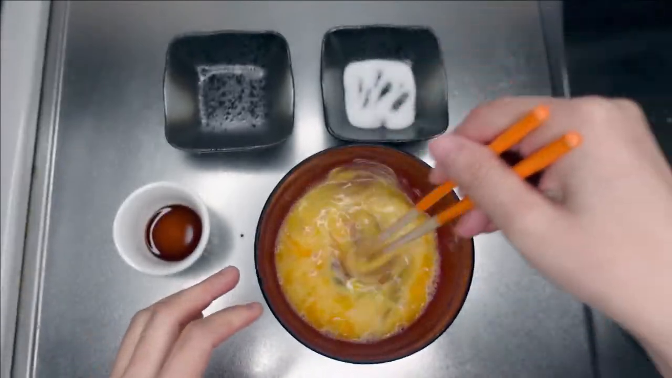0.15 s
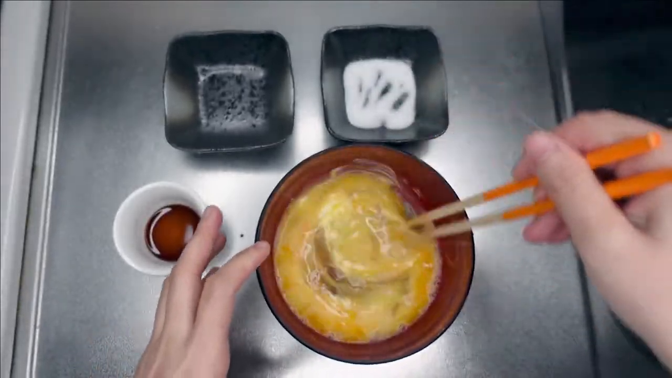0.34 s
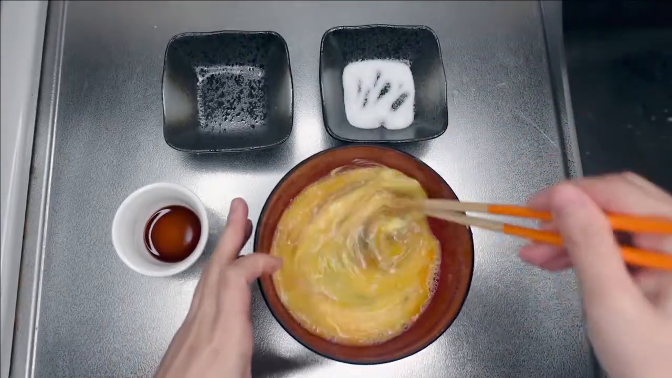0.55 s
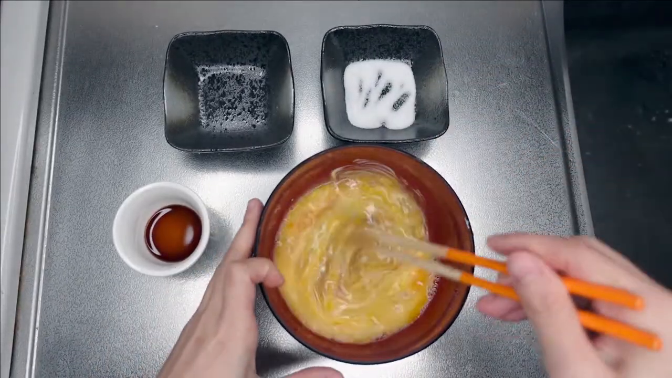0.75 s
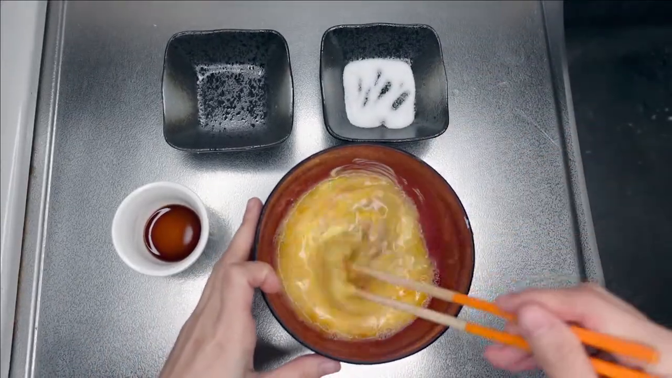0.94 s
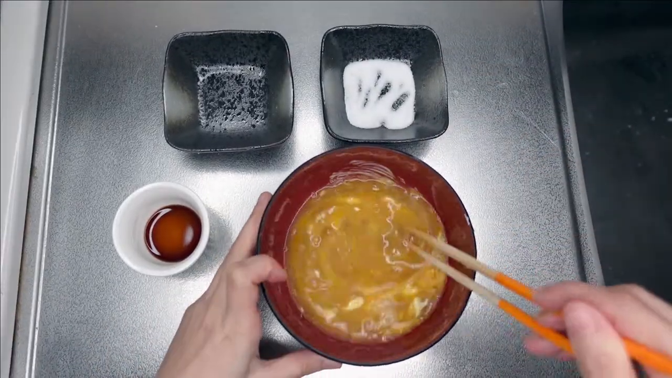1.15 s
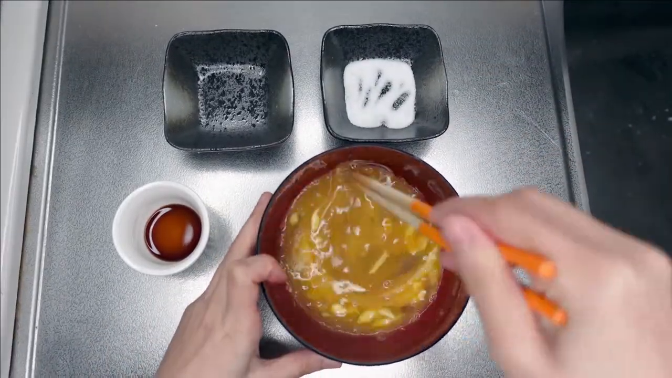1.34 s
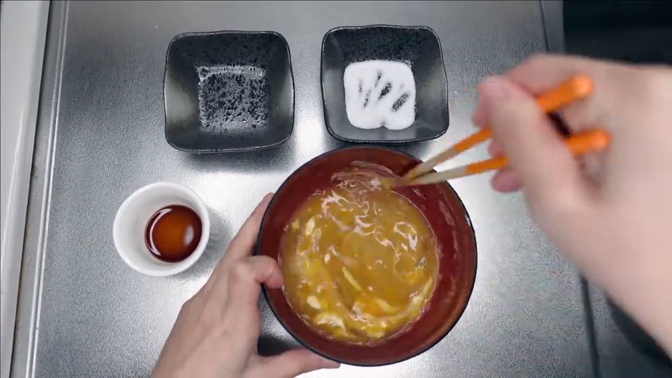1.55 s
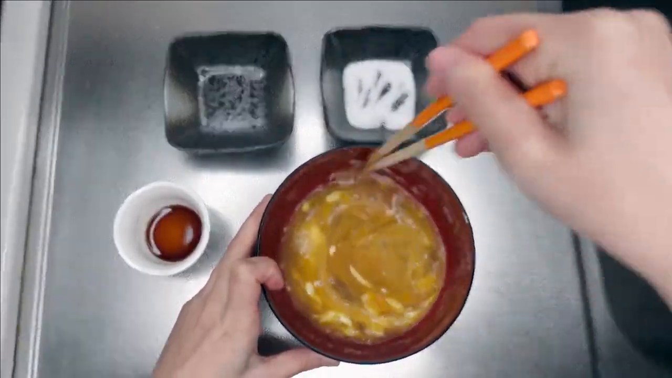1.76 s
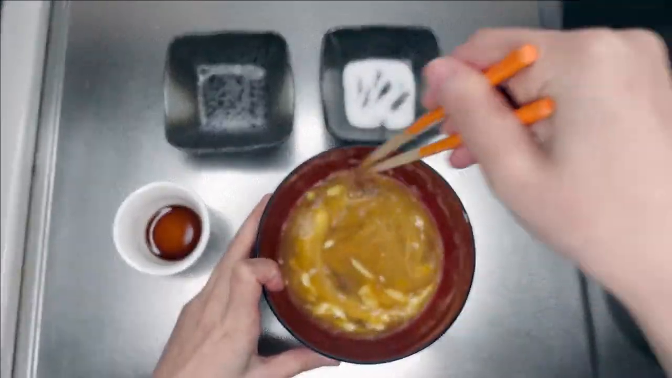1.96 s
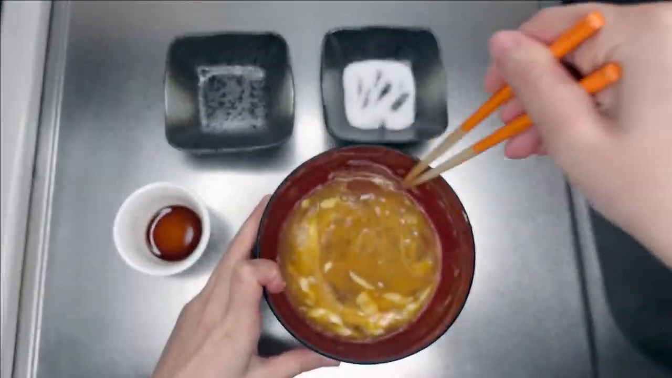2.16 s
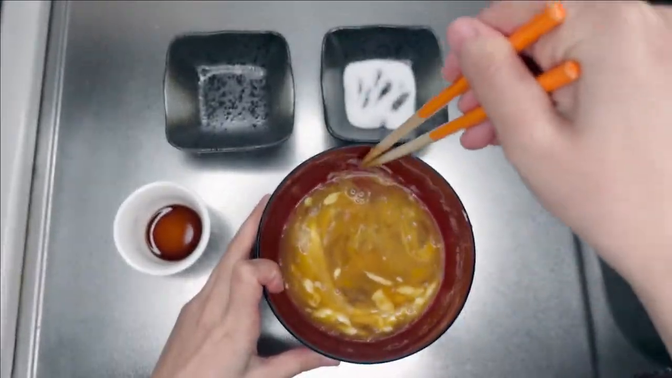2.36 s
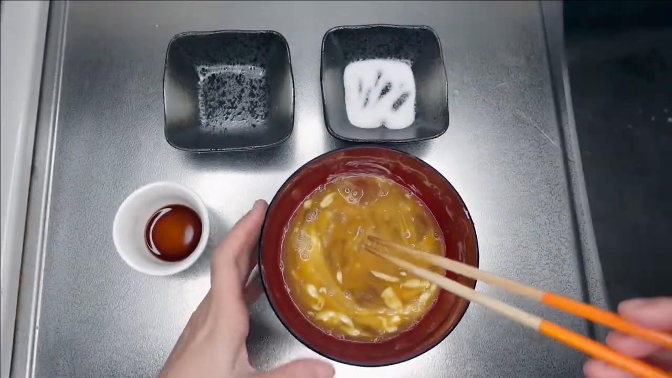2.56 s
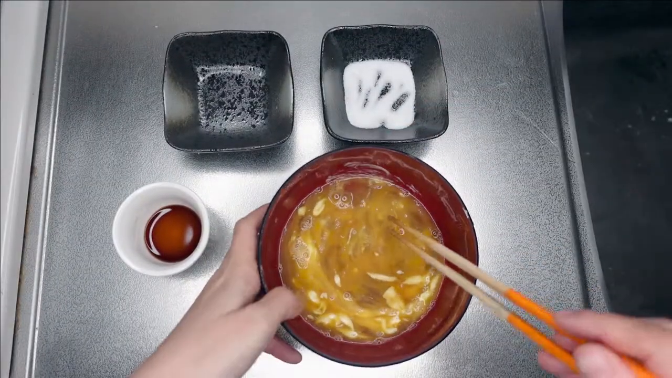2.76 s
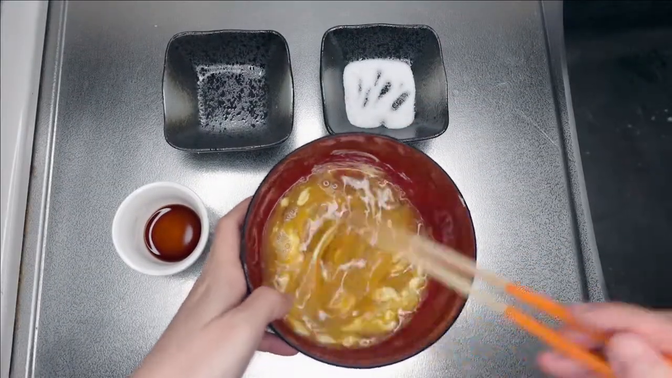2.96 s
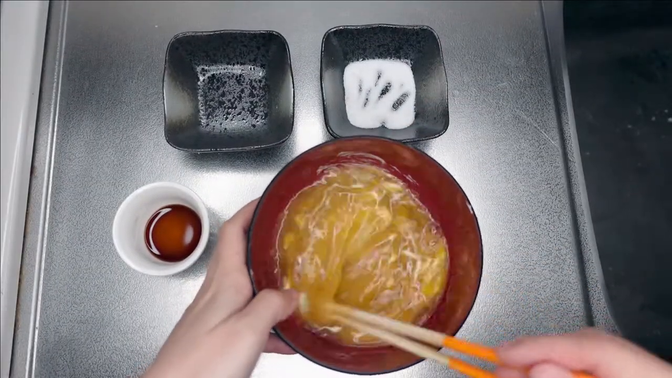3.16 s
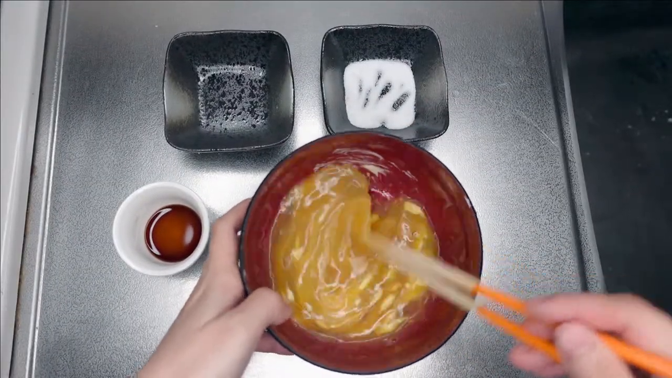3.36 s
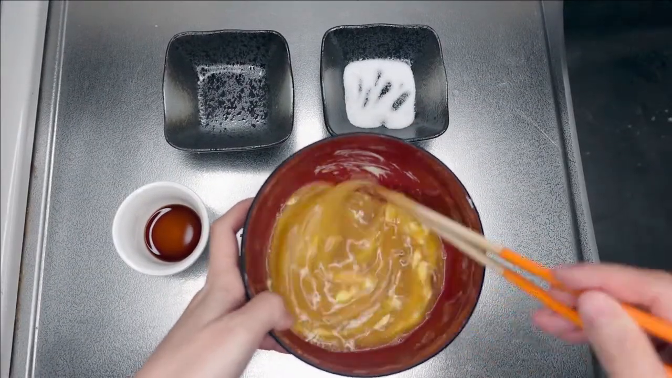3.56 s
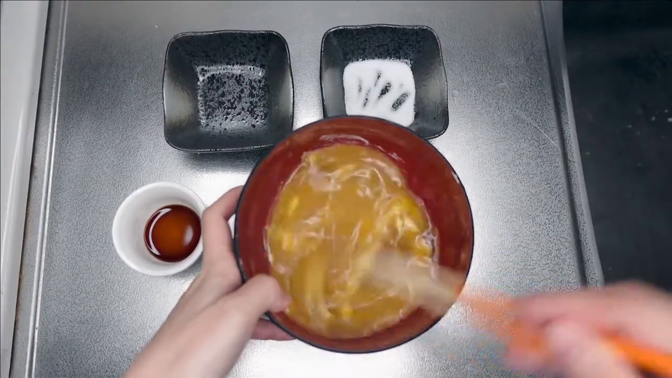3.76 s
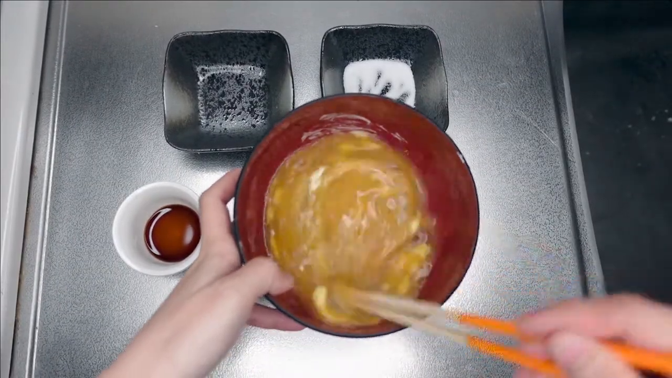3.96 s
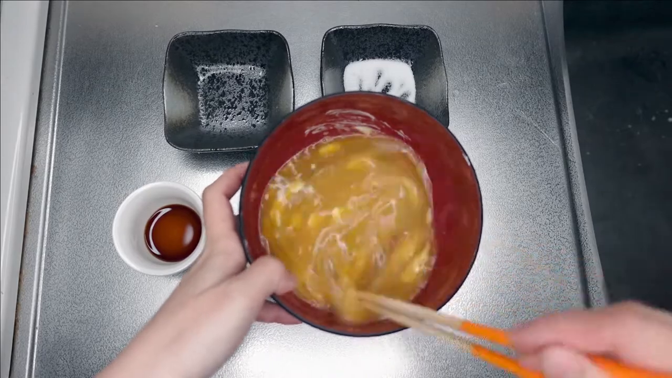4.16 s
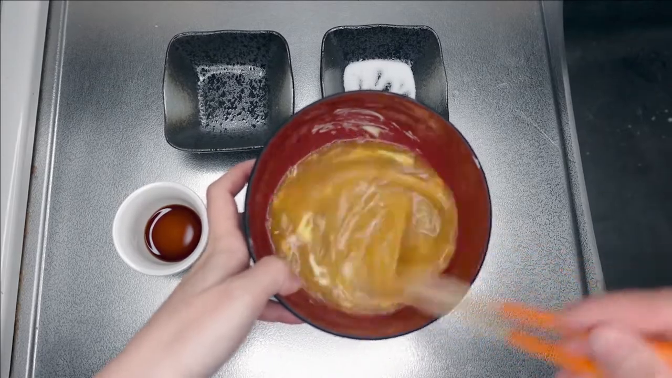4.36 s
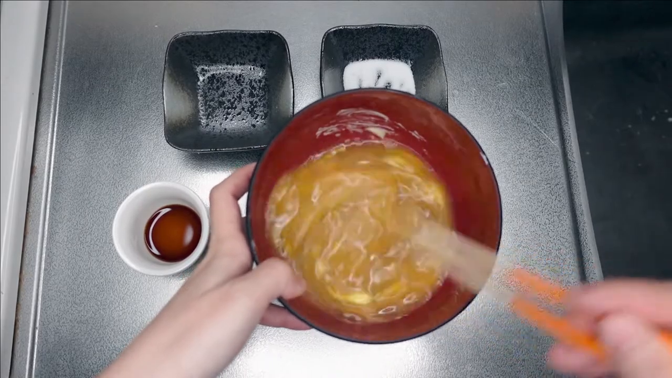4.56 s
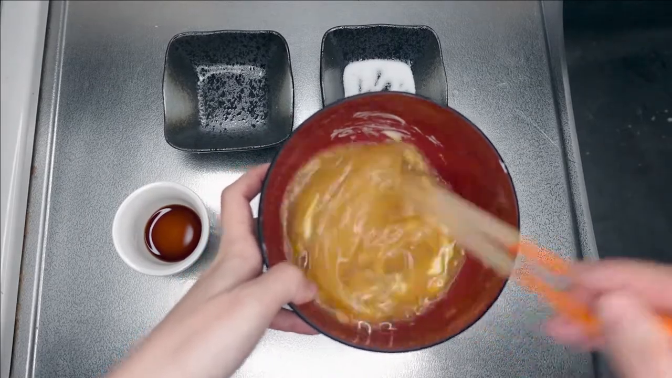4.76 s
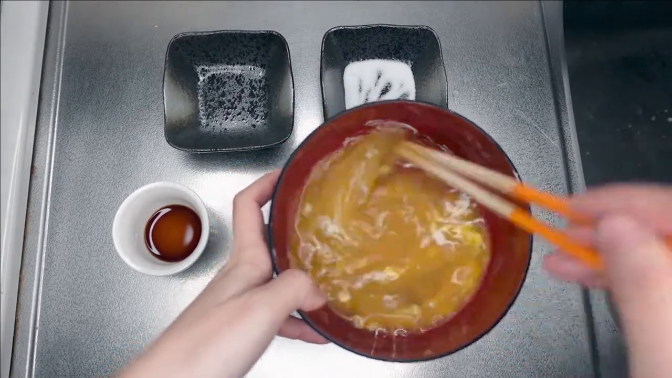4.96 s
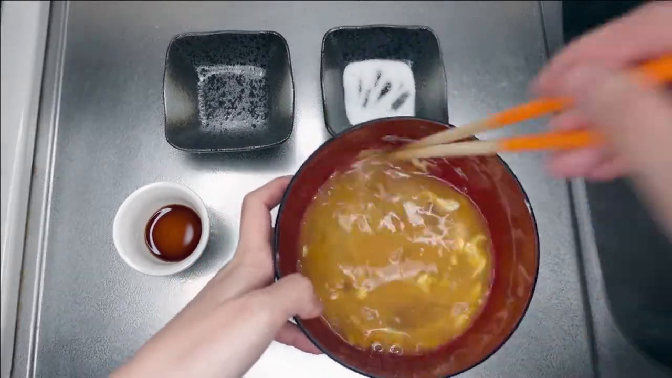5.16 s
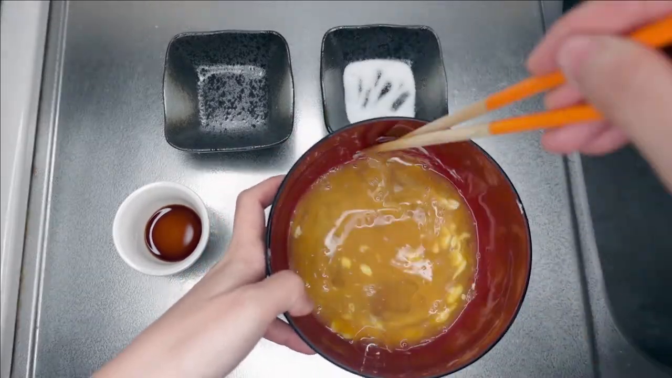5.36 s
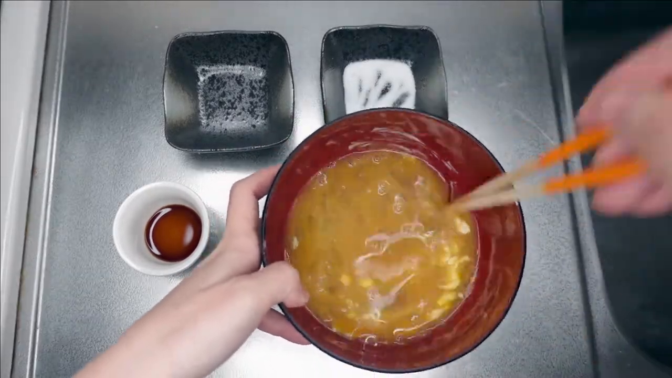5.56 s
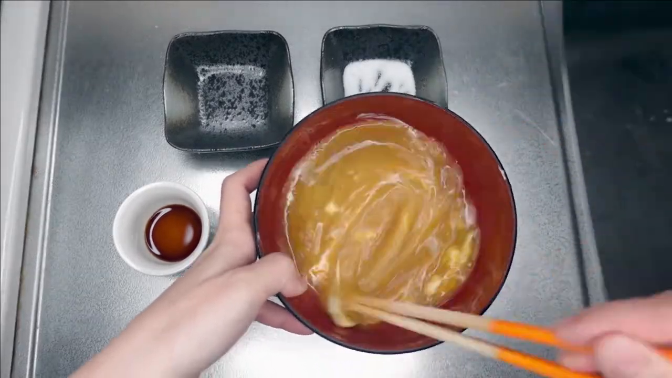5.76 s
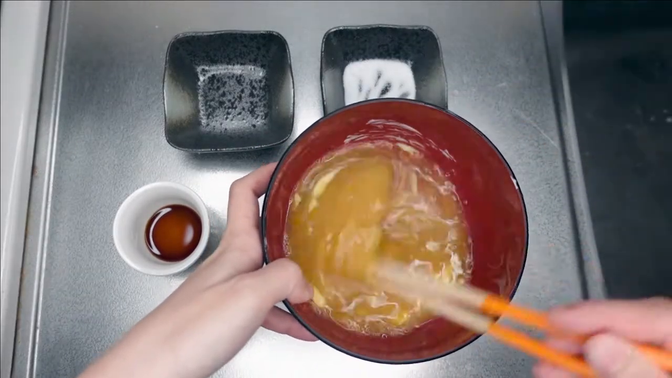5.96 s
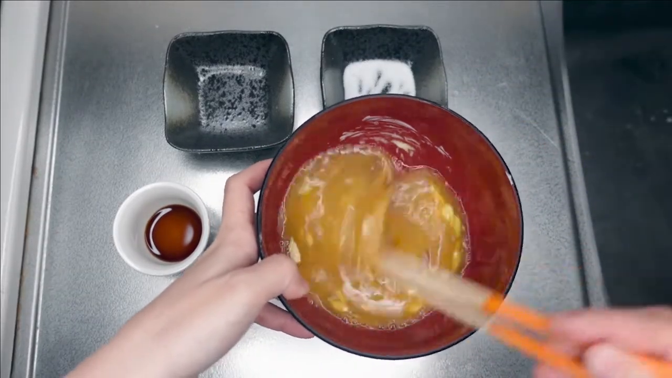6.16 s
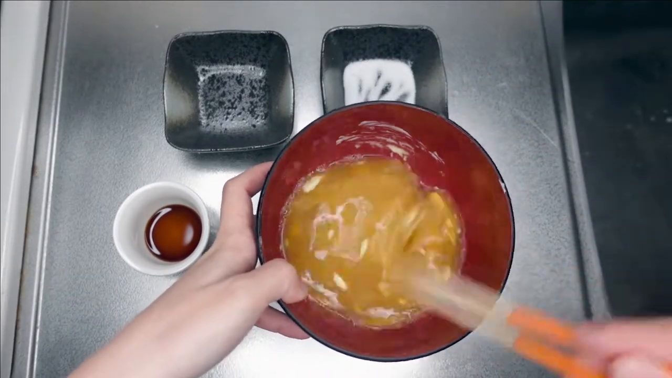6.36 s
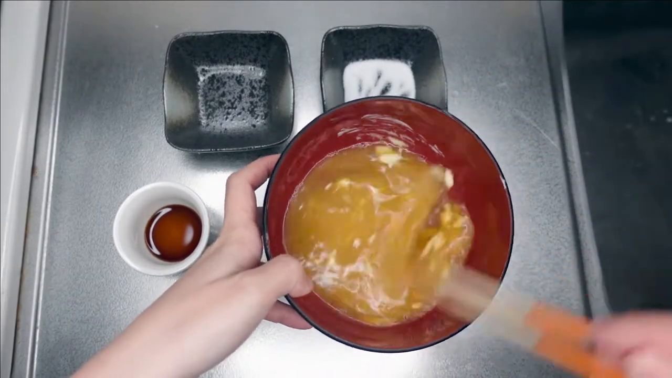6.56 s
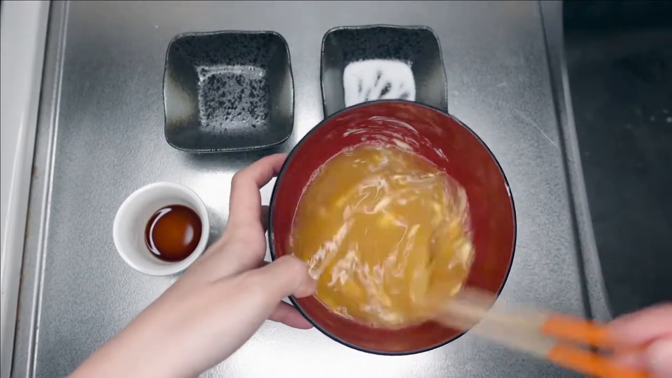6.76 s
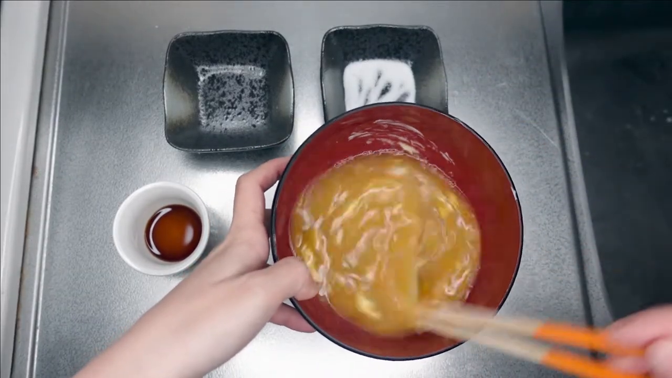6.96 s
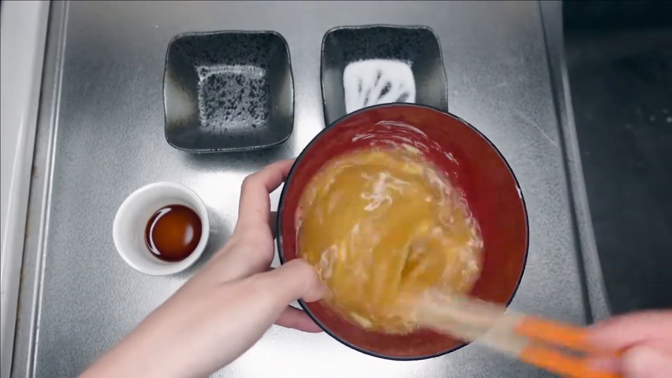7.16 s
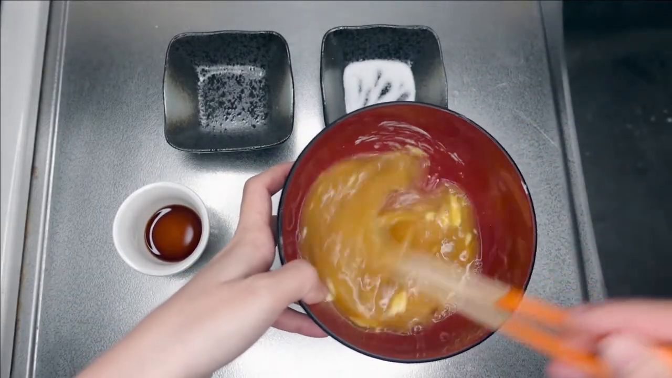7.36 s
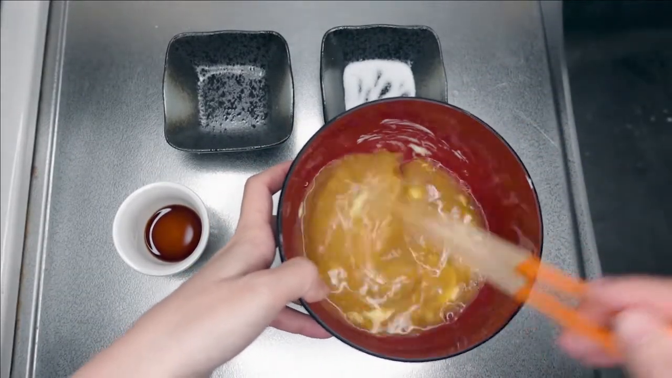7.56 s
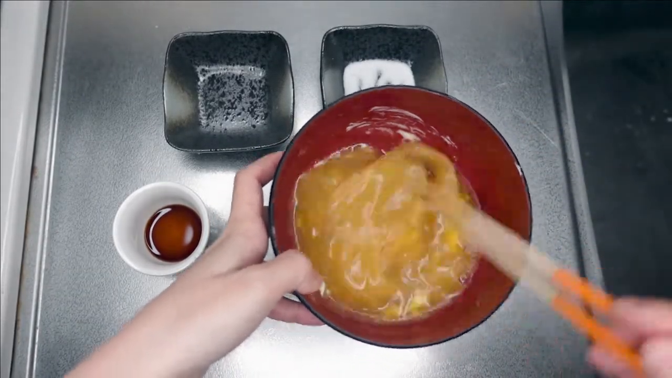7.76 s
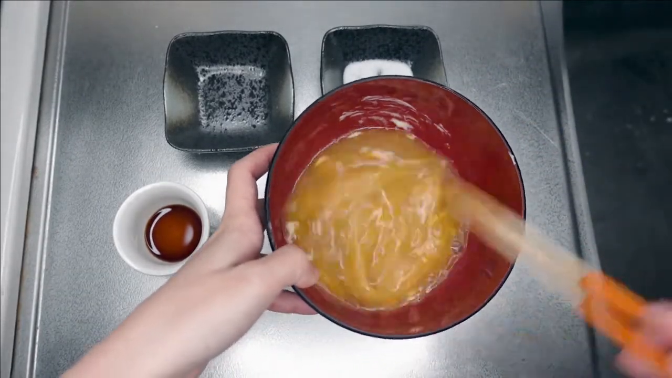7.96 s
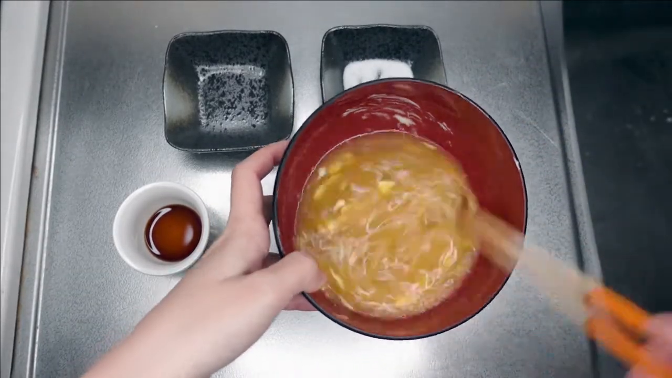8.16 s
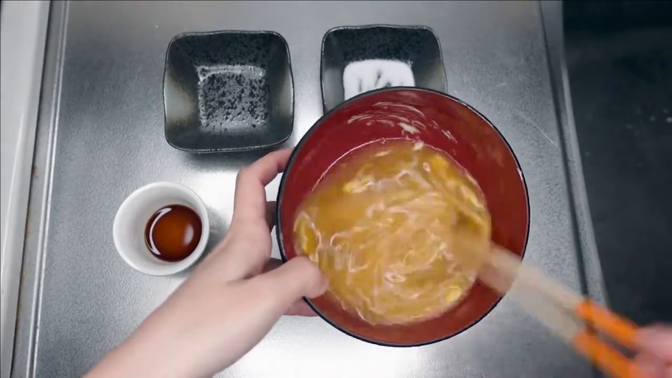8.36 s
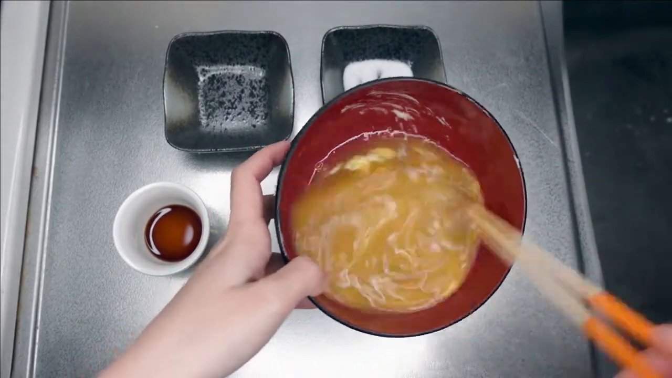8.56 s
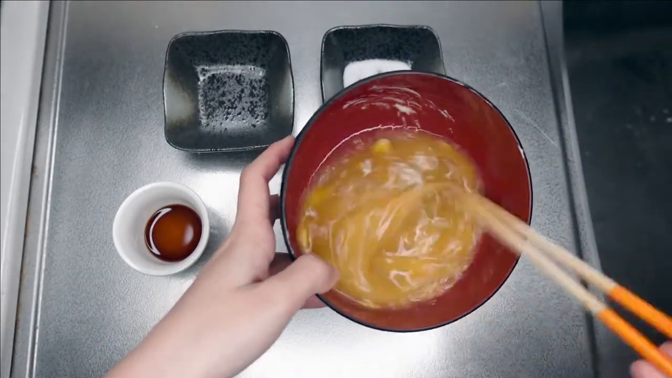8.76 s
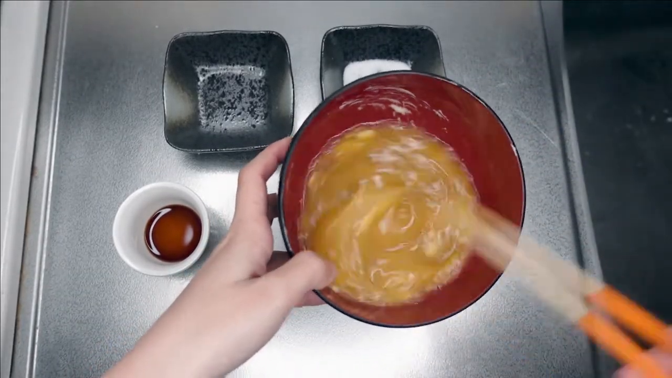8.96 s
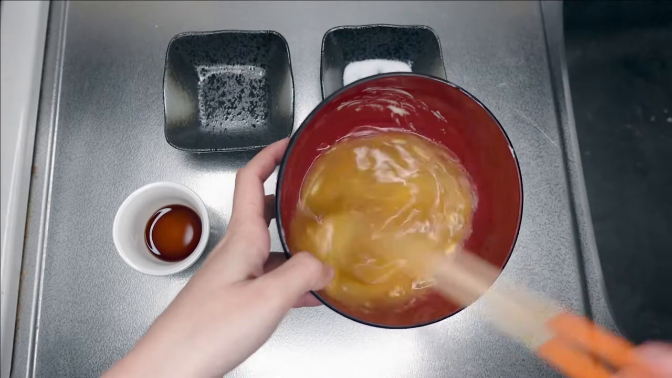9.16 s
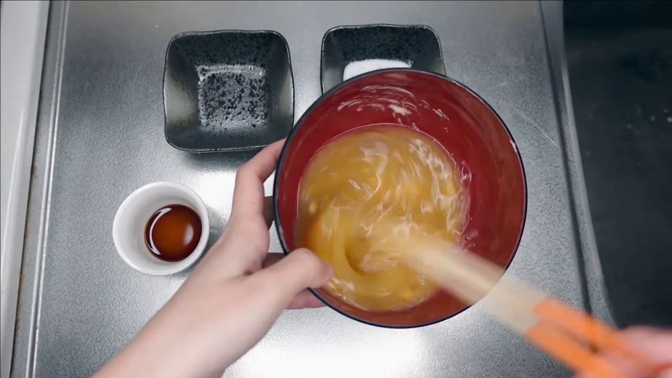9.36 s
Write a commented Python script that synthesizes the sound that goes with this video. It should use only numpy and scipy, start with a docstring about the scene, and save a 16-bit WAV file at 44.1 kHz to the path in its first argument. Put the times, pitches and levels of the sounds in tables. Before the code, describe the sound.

Close up in a small hard kitchen, wooden chopsticks beat egg in a light lacquered bowl. A few muted knocks and low bumps of the bowl on steel stop abruptly just after one second. Quiet scraping and thin bright ticks follow, then beating turns fast and loud, about ten clacks a second, with wet gliding pops. It eases briefly around five seconds, then runs strongly to the end.

```python
"""Beating egg with chopsticks

Two wooden chopsticks beat raw egg in a light lacquered bowl held over a steel kitchen counter.
The tips slide, knock and chatter, driving the wall's damped modes; egg pockets pop as short gliding sine pairs.
At first the bowl rocks on the counter, a noise-driven rattle of the sheet's modes, and rings freely.
Shaped noise makes the low room rumble, wavering distant hum and faint hiss below."""
import sys
import numpy as np
from scipy import signal
from scipy.fft import rfft, irfft, next_fast_len
from scipy.io import wavfile

SR = 44100
rng = np.random.default_rng(int(sys.argv[2]) if len(sys.argv) > 2 else 0)


def pcm_store(signal):
    """Save signal as 16-bit PCM."""
    levels = np.round(np.clip(np.atleast_2d(signal), -1, 1) * 32767)
    wavfile.write(sys.argv[1], SR, levels.astype(np.int16).T)


N = 415422

RING_STOP_S = 1.147   # sounds begun earlier stop short here
CUTOFF_HZ = 16600
MODE_SCATTER_DB = 5
SIDE_DB = -7   # stereo difference re centre


def from_db(db):
    """Decibels to gain."""
    return 10 ** (np.asarray(db) / 20)


def rms_one(x):
    """Scale to rms 1."""
    return x / np.sqrt(np.mean(x ** 2) + 1e-20)


def filtered(x, order, hz, kind="low"):
    """Butterworth filter."""
    return signal.sosfilt(signal.butter(order, hz, kind, fs=SR, output="sos"), x)


def sides(pan_db):
    """Left and right gains."""
    return from_db([[pan_db / 2], [-pan_db / 2]])


def mid_side(mid, side, side_db):
    """Stereo from a centre and an opposed difference signal."""
    return mid + from_db(side_db) * side * [[1], [-1]]


def ring(force, hz, t60_s):
    """Damped mode: a unit click rings at height 1; little passes far below the mode."""
    radius = from_db(-60 / (t60_s * SR))
    angle = 2 * np.pi * hz / SR
    return signal.lfilter([.5, 0, -.5], [1, -2 * radius * np.cos(angle), radius ** 2], force)


def ring_modes(force, modes, pan_db):
    """One force drives many damped modes, each with scattered level and pan."""
    total = 0
    for hz, level_db, t60_s in modes:
        gain = from_db(level_db + rng.normal(0, MODE_SCATTER_DB))
        total = total + gain * sides(rng.normal(0, pan_db)) * ring(force, hz, t60_s)
    return total


def add(out, sound, start_s):
    """Mix stereo sound in; sound begun before RING_STOP_S ends there."""
    start = round(start_s * SR)
    end = round(RING_STOP_S * SR) if start_s < RING_STOP_S else N
    count = min(sound.shape[1], end - start)
    out[:, start:start + count] += sound[:, :count]


def kitchen(room_db=-13.5, room_t60_s=0.23, room_cut_hz=14000):
    """Small hard room: a different dying noise for each side."""
    t = np.arange(round(.2 * SR)) / SR
    tail = rng.standard_normal((2, len(t))) * from_db(-60 * t / room_t60_s) * np.clip(t / 0.00066, 0, 1)
    tail = filtered(tail, 1, room_cut_hz)
    return from_db(room_db) * tail / np.sqrt(np.sum(tail ** 2) / 2)


def in_room(dry, echo):
    """Direct sound plus the kitchen's dying diffuse reply."""
    wet = signal.fftconvolve(dry.mean(axis=0)[None], echo, axes=1)
    wet[:, :dry.shape[1]] += dry
    return wet


def flutter(rate_hz, depth_db):
    """Random gain, drifting in dB between knots at rate_hz."""
    knots = rng.standard_normal(round(rate_hz * N / SR) + 2)
    return from_db(depth_db * np.interp(np.arange(N) / SR * rate_hz, np.arange(len(knots)), knots))


def wide_noise(gain_at, side_db):
    """Stereo noise with a given gain at each frequency; rms 1."""
    count = next_fast_len(N)
    hz = np.maximum(np.fft.rfftfreq(count, 1 / SR), 1)
    mid, side = irfft(rfft(rng.standard_normal((2, count))) * gain_at(hz))[:, :N]
    return rms_one(mid_side(mid, side, side_db))


def shape(points):
    """Gain over frequency from a short spectrum."""
    hz, db = np.transpose(points)
    return lambda f: from_db(np.interp(np.log(f), np.log(hz), db))


def narrow(hz, width_hz):
    """Gain over frequency of a resonance."""
    return lambda f: 1 / (1 + (2 * (f - hz) / width_hz) ** 2)


# background levels before flutter, in three stretches: time_s, rumble_db, hum_db, room_db, treble_db
BACKGROUND_LEVELS = [
    [(0.0, -56, -73, -61, -64), (0.3, -65, -60, -60, -66), (0.59, -58, -54.5, -54.5, -59),
     (0.818, -59, -58.5, -57.5, -61), (1.14, -70, -74, -64.5, -64)],
    [(1.15, -77, -103, -69, -60.5), (1.4, -66.5, -76, -63.5, -73), (1.814, -65.5, -68, -64.5, -64.5),
     (2.128, -60, -61.5, -63.5, -65.5), (2.38, -65, -85, -63, -61.5), (2.6, -69, -80, -59.5, -71.5),
     (3.0, -73, -69, -61.5, -65.5)],
    [(3.01, -84, -74, -66, -76), (3.13, -76, -77, -69, -73), (4.04, -80.5, -77, -64.5, -75),
     (5.22, -67, -54.5, -64, -64), (5.75, -73, -51.5, -61.5, -61), (6.04, -74, -47, -57, -83),
     (6.29, -72, -53, -57, -62), (6.85, -66, -63.5, -56.5, -66), (7.6, -60.5, -57, -58.5, -69),
     (8.7, -72, -61.5, -62.5, -71), (9.42, -71, -67, -63, -71)],
]
# rumble spectrum: freq_hz, density_db (per Hz, relative)
RUMBLE_SPECTRUM = [(15, -82), (25, -37), (85, -17), (140, -13.5), (200, -30), (260, -26), (440, -120)]
# room noise spectrum: freq_hz, density_db (per Hz, relative)
ROOM_SPECTRUM = [(120, -37), (200, -19.5), (390, -14.5), (512, -22.5), (620, -30.5), (880, -20),
                 (1900, -25.5), (2300, -46), (6000, -71), (16000, -68)]
# treble hiss spectrum: freq_hz, density_db (per Hz, relative)
TREBLE_SPECTRUM = [(1200, 1), (3000, 4.5), (9000, -3.5), (16000, -5)]


def background(hum_hz=180.2, hum_width_hz=39.6, whistle_hz=566, whistle_width_hz=46, whistle_db=-5):
    """Fluttering shaped noises: rumble, hum, room noise with a thin whistle, treble hiss."""
    time_s, *levels_db = np.concatenate(BACKGROUND_LEVELS).T
    t = np.arange(N) / SR
    rumble, hum, room, treble = (from_db(np.interp(t, time_s, db)) for db in levels_db)
    whistle = from_db(whistle_db) * wide_noise(narrow(whistle_hz, whistle_width_hz), SIDE_DB)
    rumble = rumble * flutter(8, 5.3) * wide_noise(shape(RUMBLE_SPECTRUM), -15)
    hum = hum * flutter(5.1, 0.63) * wide_noise(narrow(hum_hz, hum_width_hz), -17.5)
    room = room * flutter(20, 2.5) * (wide_noise(shape(ROOM_SPECTRUM), SIDE_DB) + whistle)
    treble = treble * flutter(15, 2.9) * wide_noise(shape(TREBLE_SPECTRUM), SIDE_DB)
    return rumble + hum + room + treble


# dull thumps: start_s, level_db (dry peak); the bowl's foot on the counter early on, egg sloshing from 2.6 s
BUMP_EVENTS = [(0.21, -50), (0.382, -34), (0.408, -30.5), (0.63, -30), (0.897, -38.5), (1.118, -27.5),
               (2.645, -50.5), (2.749, -44.5), (2.837, -43)]
# steel counter modes: freq_hz, level_db (before scatter), t60_s
COUNTER_MODES = [(106, -8, 0.28), (260, 4.5, 0.048), (444, 10, 0.017), (816, -20, 0.014),
                 (1120, 21, 0.0047), (1300, -11.5, 0.0035), (1640, -4, 0.027), (2600, 15, 0.009)]


def bumps(echo, rattle_t60_s=0.19, soft_hz=1500):
    """Dull thumps drive the steel sheet's modes with dying soft noise: first the bowl's foot rattling on it,
    later the egg sloshing."""
    out = np.zeros((2, N))
    t = np.arange(round(.3 * SR)) / SR
    for start_s, level_db in BUMP_EVENTS:
        force = filtered(rng.standard_normal(len(t)), 2, soft_hz)
        force = force * from_db(-60 * t / rattle_t60_s) * np.clip(t / 0.0027, 0, 1)
        sheet = ring_modes(force, COUNTER_MODES, 0.35)
        add(out, from_db(level_db) * in_room(sheet / np.abs(sheet).max(), echo), start_s)
    return out


# air pockets closing in the egg: start_s, level_db (nominal, dry), pitch_hz (at start), t60_s
POCKET_EVENTS = [(0.381, -27, 976, 0.075), (0.384, -29.5, 1688, 0.09), (0.632, -35.5, 519, 0.13),
                 (2.39, -39, 1142, 0.066), (2.757, -40.5, 600, 0.047), (2.84, -34.5, 424, 0.046),
                 (3.36, -35.5, 1645, 0.081), (3.086, -32, 970, 0.097), (3.201, -34.5, 965, 0.14),
                 (4.463, -30, 2050, 0.195), (4.477, -18, 2090, 0.029), (7.811, -23.5, 1110, 0.015),
                 (7.972, -19.5, 860, 0.013), (6.791, -14.5, 1960, 0.022), (3.495, -32, 534, 0.15),
                 (3.556, -20, 910, 0.02), (3.58, -13, 1100, 0.05), (3.775, -17.5, 980, 0.014),
                 (4.038, -34, 826, 0.24), (4.063, -26.5, 636, 0.084), (4.366, -10.5, 960, 0.016),
                 (4.42, -15, 870, 0.017), (4.638, -19.5, 963, 0.017), (4.846, -18, 1060, 0.018),
                 (4.966, -25.5, 846, 0.067), (5.034, -16.5, 1127, 0.017), (6.322, -24.5, 1003, 0.05),
                 (5.911, -27.5, 964, 0.04), (6.49, -33, 547, 0.032), (7.278, -33, 533, 0.04),
                 (7.336, -35.5, 594, 0.034), (6.838, -21, 1950, 0.083), (8.458, -19, 2080, 0.044),
                 (8.595, -35.5, 1076, 0.098), (6.485, -18, 1130, 0.045), (7.035, -19.5, 906, 0.018),
                 (7.274, -25.5, 860, 0.026), (7.33, -22, 960, 0.07), (8.068, -27, 857, 0.054),
                 (8.412, -9.5, 950, 0.021), (8.875, -21.5, 906, 0.019), (8.991, -17, 930, 0.012)]


def pockets(echo, rise=0.047, attack_s=0.0016, twin_db=-8, twin_apart=0.066,
            squeeze_db=-28, squeeze_db_per_s=900):
    """A squeezed pocket murmurs, then rings as an uneven pair of close notes that beat and climb a little."""
    lead_s, wobble_db, pan_db = .018, 8, 4
    out = np.zeros((2, N))
    t = np.arange(round(.14 * SR)) / SR - lead_s
    wobble = flutter(350, wobble_db)
    for start_s, level_db, pitch_hz, t60_s in POCKET_EVENTS:
        phase = 2 * np.pi * pitch_hz * (t + rise * t * abs(t) / t60_s)
        squeeze = from_db(squeeze_db - squeeze_db_per_s * abs(t))
        squeeze = squeeze * np.clip(2 + 2 * t / lead_s, 0, 1) * (t < attack_s)
        envelope = np.maximum(squeeze, np.clip(t / attack_s, 0, 1) * from_db(-60 * t / t60_s))
        twin = np.sin(phase * (1 + twin_apart * rng.choice([-1, 1])))
        twin = from_db(twin_db) * twin * sides(rng.normal(0, 2 * pan_db))
        steady = (np.sin(phase) * sides(rng.normal(0, pan_db)) - twin) * envelope
        note = steady * wobble[round(start_s * SR):][:len(t)]
        note = note * np.linalg.norm(envelope) / np.linalg.norm(note)   # pan and wobble keep the energy
        add(out, from_db(level_db) * in_room(note, echo), start_s - lead_s)
    return out


def contact(slide_db, chatter_db, lead_s, swell_db_per_s=250, fade_db_per_s=350, drag_s=0.018,
            lift_db_per_s=900, linger_db=-16, linger_t60_s=0.067, wet_cut_hz=7500,
            rattle_s=0.005, first_db=3.5, later_db=-2):
    """Tip force: a gritty slide swells, blows rattle, a clumpy drag lasts until the tips lift, a scrape lingers."""
    grit_db, clump_db, drag_scatter = 3.5, 3, .3
    t = np.arange(round(.12 * SR)) / SR - lead_s
    grit = rng.standard_normal(len(t)) * from_db(grit_db * np.minimum(rng.exponential(1, len(t)), 4) - 6)
    clumps = np.interp(t, np.linspace(t[0], t[-1], 30), rng.standard_normal(30))
    grit = filtered(grit * from_db(clump_db * clumps), 2, wet_cut_hz)   # the egg cushions the rubbing
    swell = from_db(slide_db + swell_db_per_s * t) * np.clip(1 + t / lead_s, 0, 1)
    lifted_s = np.maximum(t - drag_s * rng.uniform(1 - drag_scatter, 1 + drag_scatter), 0)
    drag = from_db(chatter_db - fade_db_per_s * t - lift_db_per_s * lifted_s)
    drag = drag + from_db(chatter_db + linger_db - 60 * t / linger_t60_s)
    # lesser touches surround the main blow
    blows = np.zeros(len(t))
    lesser = np.round((lead_s + rattle_s * rng.uniform(-.5, 1, size=5)) * SR).astype(int)
    blows[lesser] = rng.choice([-1, 1], size=5) * from_db(later_db + rng.normal(0, 3, size=5))
    blows[round(lead_s * SR)] = from_db(first_db)
    return grit * np.where(t < 0, swell, drag), blows


def splat(count, lead_s, level_db=-36.5, t60_s=0.034, gather_db_per_s=4000):
    """Egg thrown against the wall: bright noise gathers just before the blow and dies after it."""
    t = np.arange(count) / SR - lead_s
    envelope = from_db(level_db - np.where(t < 0, -gather_db_per_s * t, 60 * t / t60_s))
    mid, side = rng.standard_normal((2, count)) * envelope
    return filtered(mid_side(mid, side, SIDE_DB), 1, [4940, 9000], "band")


# tips on the bowl: start_s, level_db (nominal, dry), stick_hz,
# slide_db (before the blow, re blow, before SLIDE_DB), bright_db (relative)
KNOCK_EVENTS = [(0.038, -44.5, 2680, -5, -6), (0.279, -31.5, 4370, -52, 31.5), (0.288, -24, 2820, -43, 0),
                (0.382, -32.5, 1760, -24, -7), (0.568, -32.5, 2670, -46, -35), (0.846, -27, 2400, -54, -28),
                (1.117, -15, 3820, -60, 5), (1.42, -46, 2520, -29, -25), (1.49, -30.5, 2670, 9, 15),
                (1.589, -25, 2870, -28, 8), (1.711, -20.5, 3460, -20, 16), (1.818, -44.5, 3160, -14, 26),
                (1.88, -20, 4600, -11, 23), (2.006, -18.5, 4600, -10.5, 22.5), (2.079, -20.5, 3080, -38, 1),
                (2.161, -41, 4700, -30, 33), (2.204, -20.5, 3970, -36, 13), (2.244, -30.5, 3260, -30, 0),
                (2.292, -34.5, 3600, -14, 4), (2.36, -37.5, 3200, -2, 3), (2.39, -35, 3380, -13, 14),
                (2.464, -43.5, 4060, -19.0, 27), (2.547, -43.5, 3080, -5, 13), (2.918, -19, 3350, -32, -7),
                (3.079, -13, 2640, -26.5, 5), (3.095, -18.5, 2700, -2, -10), (3.137, -32.5, 3320, -5, 3),
                (3.208, -17, 4180, -11.5, 9.5), (3.317, -18.5, 3080, -26, -16),
                (3.359, -39.5, 1650, -22, -18), (3.437, -11, 3020, -31.5, 5), (3.485, -24, 3080, -44, 18),
                (3.495, -15, 4080, -52, -35), (3.548, -11, 3080, -30, 10.5), (3.581, -14, 2660, -26, 22),
                (3.656, -12, 3300, -24.5, 9), (3.718, -31, 3240, -41, 32.5), (3.777, -19.5, 3000, 1.5, 18),
                (3.885, -16, 3120, -30, -19), (3.927, -17, 2340, -20, 23.5), (4, -8.5, 3460, -27.5, -3),
                (4.045, -17.5, 1610, -17.5, -30), (4.105, -10.5, 3500, -25, 0),
                (4.211, -9.5, 3630, -16, -6), (4.313, -13, 3100, -22.5, 17), (4.365, -18, 2030, -25, 8),
                (4.42, -13, 2450, -35, -8), (4.475, -24, 2120, -32, 13), (4.529, -7.5, 2890, -26, 3),
                (4.58, -25, 1580, 14, -34), (4.636, -18, 2480, -42, -22), (4.692, -20.5, 3100, -38, 9),
                (4.744, -17, 3100, 10, 12), (4.847, -15, 2940, -28, -17), (4.899, -18, 1800, -15.5, 20.5),
                (4.945, -8.5, 3960, -31, 14.5), (4.972, -21.5, 2510, -1, -18), (5.034, -15.5, 2650, -35, 3),
                (5.101, -41, 1770, -22, -16), (5.224, -23.5, 2870, 14, -2), (5.278, -33, 3030, -30, 19),
                (5.334, -17.5, 3100, -36, 10), (5.491, -27.5, 3530, -27, 2), (5.536, -29.5, 3430, -6, 14),
                (5.593, -31.5, 4130, 3, 32.5), (5.617, -34.5, 3600, -4, 7), (5.766, -41.5, 2640, 9, -17),
                (5.835, -28, 2920, -29, 20), (5.856, -26, 2870, 2, -19), (5.907, -19, 2550, -24, 14),
                (5.916, -18, 2600, -17, -1), (5.957, -16, 2300, -26.5, -18), (6.03, -14, 3460, 2.5, -11),
                (6.068, -26.5, 2900, -30, 10), (6.133, -15, 2470, -14, 6), (6.231, -15, 3030, -21, 14),
                (6.324, -14.5, 3770, -14, 20.5), (6.374, -27, 2900, -29, 21), (6.428, -9, 3570, -20, 5),
                (6.485, -16, 2160, -24.5, 18), (6.53, -16, 2910, -32, -15), (6.588, -37.5, 1640, -10, 9),
                (6.629, -10, 2780, -18.5, 7), (6.734, -8.5, 3600, -29, -8), (6.789, -19.5, 1960, -67, 0),
                (6.836, -10, 3400, -21.5, 2), (6.877, -19, 1750, -31, 2), (6.932, -9.5, 3370, -24, 8.5),
                (6.98, -27.5, 3450, 5, -6), (7.035, -12.5, 2490, -25, 8), (7.134, -9.5, 3290, -17.5, 0),
                (7.228, -10.5, 2580, -24, 0), (7.267, -20, 2470, -24, -14), (7.289, -25, 2000, 7, -1),
                (7.335, -19, 2250, -13, 8), (7.374, -14, 2100, -20, 4), (7.441, -10, 2280, -32, 8.5),
                (7.494, -21.5, 2040, -78, 2), (7.539, -22.5, 1930, -63, -12), (7.639, -20, 2420, -1, -6),
                (7.741, -14.5, 4020, -14, 3), (7.809, -24, 2150, -9.5, 26), (7.856, -11.5, 2220, -21, 1),
                (7.971, -16.5, 2500, -1.5, 15), (8.005, -20, 3700, -11, -33), (8.06, -5.5, 3360, -22, -2),
                (8.164, -9, 3140, -26.5, -2), (8.264, -10.5, 3360, -22, 7), (8.287, -29, 2570, -18, 6),
                (8.313, -23, 4560, -35, 9), (8.364, -13, 2320, -31, 1), (8.41, -18.5, 1580, -49, -5),
                (8.461, -9.5, 3240, -33, 5), (8.508, -26, 3420, -61, -13), (8.558, -8, 3160, -28, -4),
                (8.663, -8.5, 3170, -31, 5), (8.749, -28.5, 3520, -20, 15), (8.773, -34, 4470, -20, 23),
                (8.815, -29, 3000, -60, 22), (8.876, -12, 2530, -20.5, 5), (8.988, -13, 2640, -29, -10),
                (9.078, -11, 3470.0, -17.5, 6.5), (9.129, -32.5, 2650, -4, 22),
                (9.196, -18, 2240, -36, -20), (9.294, -16.5, 3920, -11, 9), (9.402, -15, 3360, 7, 19),
                (9.388, -14.5, 3560, -31, -18)]
# bowl wall modes: freq_hz, level_db (before focus and scatter), t60_s (held bowl)
BOWL_MODES = [(890, -11, 0.052), (1048, 1.5, 0.021), (1794, 7.5, 0.014), (1907, 1, 0.055),
              (2086, 2.5, 0.021), (2607, 9, 0.014), (2736, 7.5, 0.035), (2832, 2.5, 0.042),
              (3107, 12.5, 0.01), (3326, 5.5, 0.01), (3614, 13, 0.014), (4060, 0, 0.045),
              (4360, 1.5, 0.051), (5680, -25, 0.035)]
LOW_MODES_HZ = 1400
USUAL_PEAK_DB, USUAL_SLIDE_DB, USUAL_RING_HZ = -20, -22, 3000
# rubbing re blow: a long slide chatters on, a hard blow drowns it
SLIDE_DB, CHATTER_DB, CHATTER_PER_SLIDE, CHATTER_PER_FORCE = -3, -18.5, 0.38, -0.17
# low modes re wall peak: stronger for soft, dull knocks; thin rim ticks leave them quiet
LOW_DB, LOW_PER_FORCE, LOW_PER_BRIGHT, LOW_DB_PER_OCTAVE = -19, -0.19, -0.34, -3
CONTACT_HZ, BRIGHT_DB_PER_OCTAVE = 11100, 24   # a dull knock is a softer, longer contact
STICK_DB, CRACK_DB, CLACK_DB, CLACK_PER_BRIGHT = 14, 20, 32, 0.046   # dull knocks clack less
MODE_PAN_DB, STICK_PAN_DB = 6, 2   # left-right scatter
SPREAD_DB = 9   # rubbing heard apart in the two sides, re clack
FREE_RING, FREE_CHATTER_DB = 2, 8   # at first the bowl stands free: longer ring (factor), more chatter
RUB_WIDTH = 1.2   # band edges as a ratio to the stick's ring


def knocks(echo, lead_s=.03, focus_db_per_octave=7, stick_t60_s=0.016):
    """Each knock drives wall modes near the stick's ring most, with a broad clack and a bright crack."""
    out = np.zeros((2, N))
    for start_s, level_db, stick_hz, slide_db, bright_db in KNOCK_EVENTS:
        harder_db = level_db - USUAL_PEAK_DB
        free = start_s < RING_STOP_S
        chatter_db = CHATTER_DB + CHATTER_PER_SLIDE * (slide_db - USUAL_SLIDE_DB)
        chatter_db += CHATTER_PER_FORCE * harder_db + FREE_CHATTER_DB * free
        low_db = LOW_DB + LOW_PER_FORCE * harder_db + LOW_PER_BRIGHT * bright_db
        low_db += LOW_DB_PER_OCTAVE * np.log2(stick_hz / USUAL_RING_HZ)

        rubbing, blows = contact(slide_db + SLIDE_DB, chatter_db, lead_s)
        soft_hz = np.clip(CONTACT_HZ * 2 ** (bright_db / BRIGHT_DB_PER_OCTAVE), 2 * stick_hz, CUTOFF_HZ)
        blows = filtered(blows, 2, soft_hz)
        force = rubbing + blows

        modes = [(hz, db, t60_s * FREE_RING ** free) for hz, db, t60_s in BOWL_MODES]
        high_modes = [(hz, db - focus_db_per_octave * abs(np.log2(hz / stick_hz)), t60_s)
                      for hz, db, t60_s in modes if hz > LOW_MODES_HZ]
        low_modes = [mode for mode in modes if mode[0] < LOW_MODES_HZ]
        wall = ring_modes(force, high_modes, MODE_PAN_DB)
        stick = sides(rng.normal(0, STICK_PAN_DB)) * ring(force, stick_hz, stick_t60_s)
        wall = wall + from_db(STICK_DB) * stick

        # the treble comes mostly from the hardest blows
        sharp = blows * abs(blows) / abs(blows).max() + from_db(-3.5) * rubbing
        crack = from_db(CRACK_DB + bright_db) * filtered(sharp, 1, [4500, 9500], "band")
        clack_hz = [.5 * stick_hz, 1.6 * stick_hz]
        rub = filtered(rubbing, 1, [stick_hz / RUB_WIDTH, stick_hz * RUB_WIDTH], "band")
        clack = filtered(blows, 2, clack_hz, "band") + from_db(-6) * rub
        treble = crack + from_db(CLACK_DB + CLACK_PER_BRIGHT * bright_db) * clack
        # a different path to each side: 0 or 1 sample late
        wall = wall + np.array([np.roll(treble, lag) for lag in rng.integers(0, 2, size=2)])
        # the rubbing spreads across the wall
        apart = filtered(rubbing * rng.choice([-1, 1], size=len(force)), 2, clack_hz, "band")
        wall = mid_side(wall, apart, CLACK_DB + SPREAD_DB)

        low = ring_modes(force, low_modes, MODE_PAN_DB)
        sound = wall / np.abs(wall).max() + from_db(low_db) * low / np.abs(low).max()
        sound = sound + from_db(bright_db) * splat(len(force), lead_s)
        sound = filtered(sound, 4, 600, "high")   # a small bowl radiates no bass
        add(out, from_db(level_db) * in_room(sound, echo), start_s - lead_s)
    return out


def scene():
    """All sources in the kitchen."""
    echo = kitchen()
    return background() + bumps(echo) + pockets(echo) + knocks(echo)


def record(dry):
    """The top is cut steeply."""
    return signal.sosfilt(signal.cheby2(12, 60, CUTOFF_HZ, fs=SR, output="sos"), dry)


dry = scene()
out = record(dry)
pcm_store(out)
```